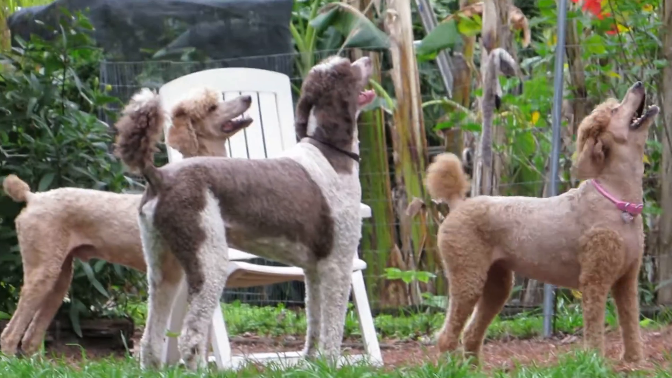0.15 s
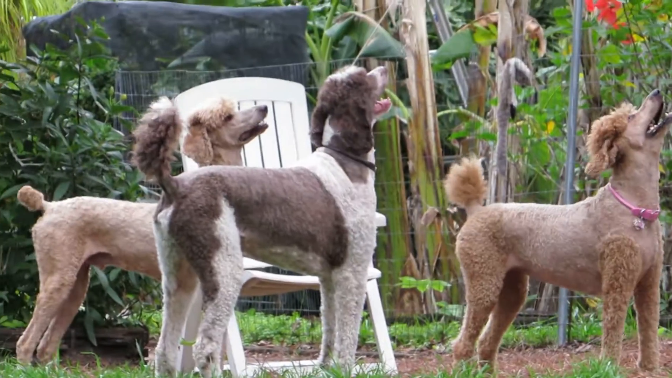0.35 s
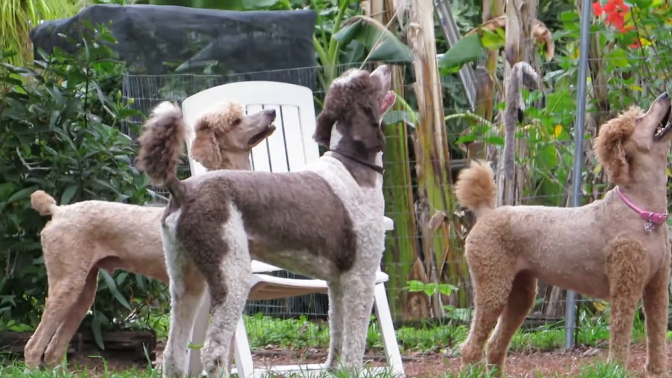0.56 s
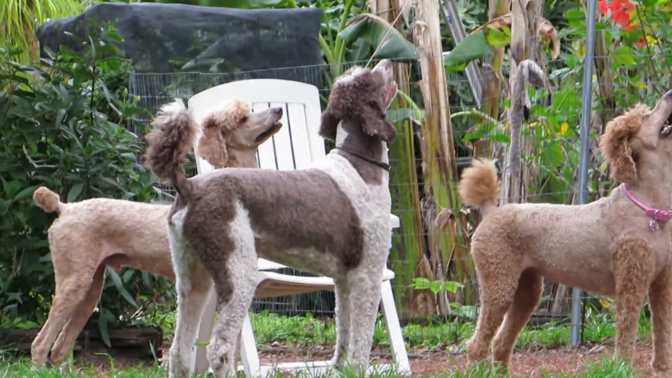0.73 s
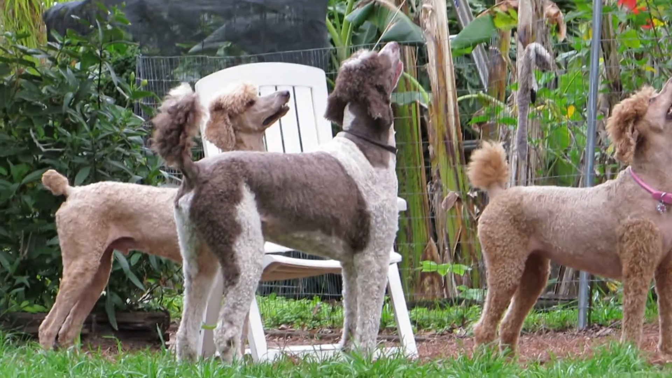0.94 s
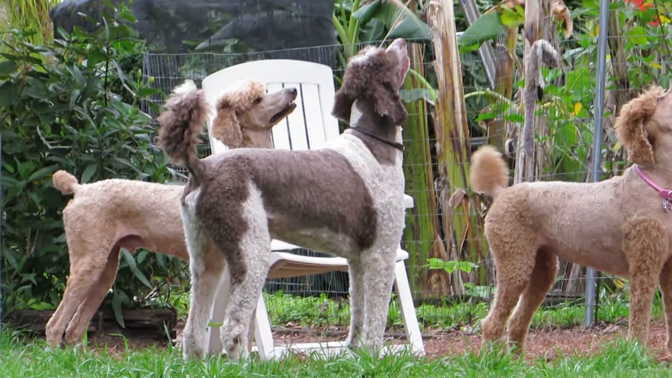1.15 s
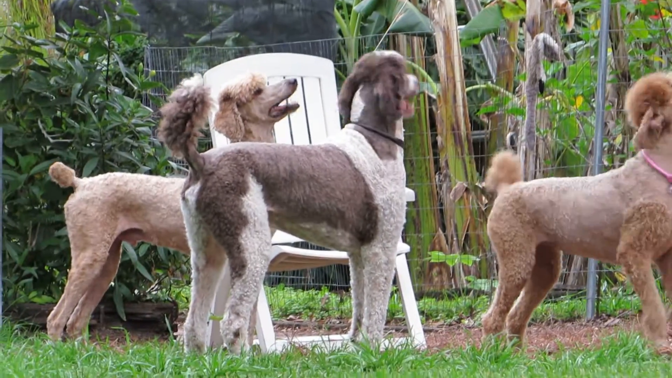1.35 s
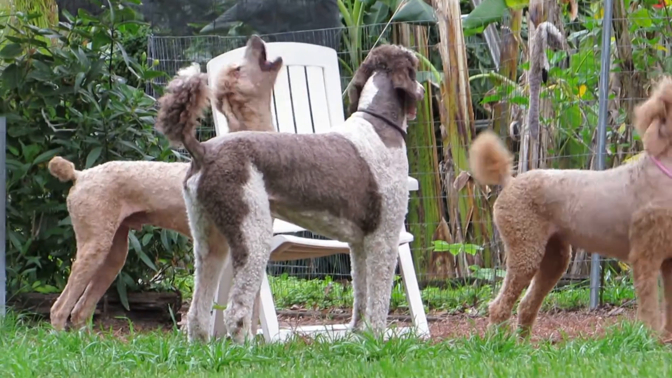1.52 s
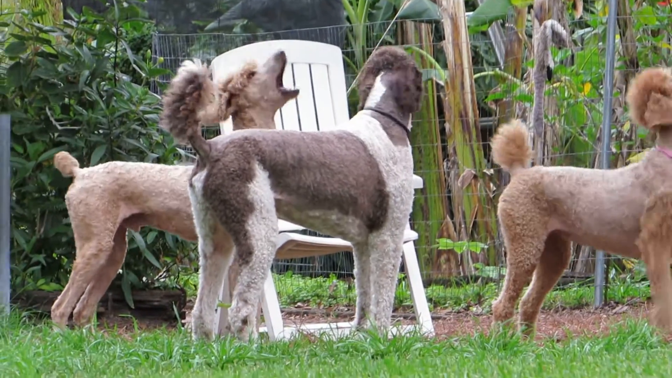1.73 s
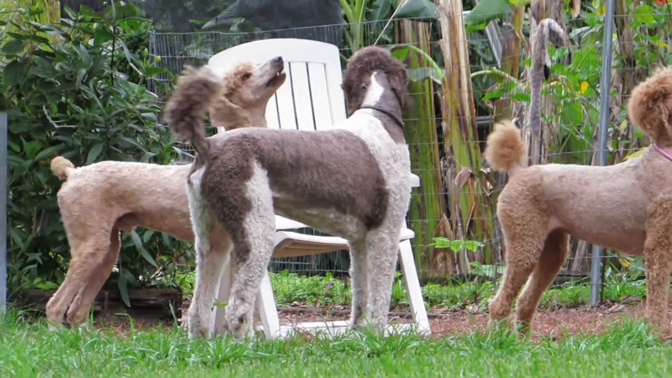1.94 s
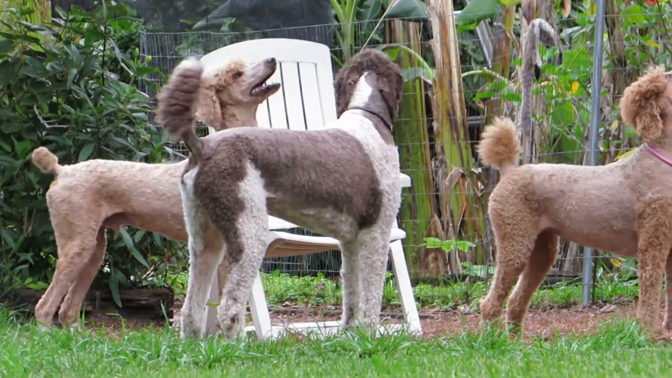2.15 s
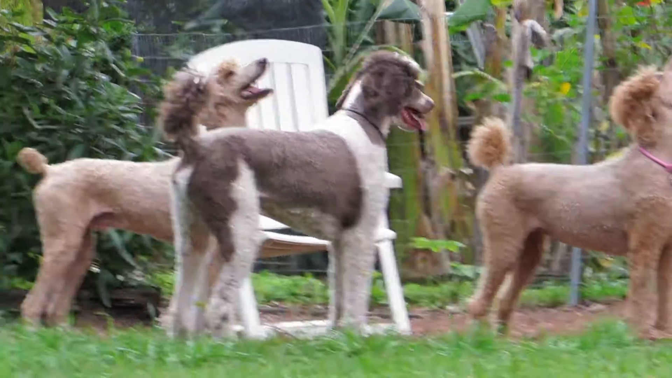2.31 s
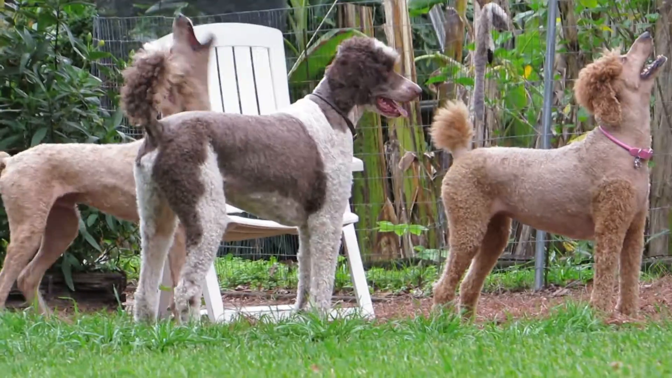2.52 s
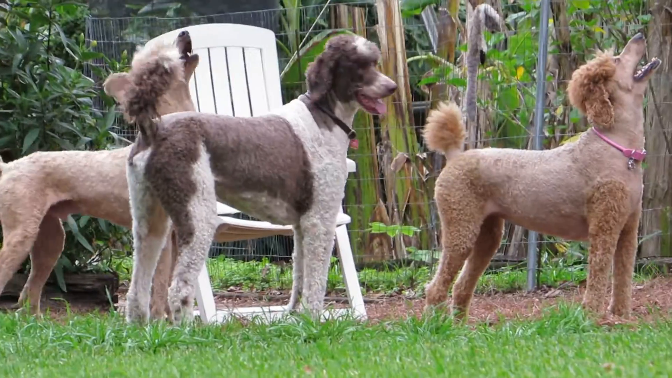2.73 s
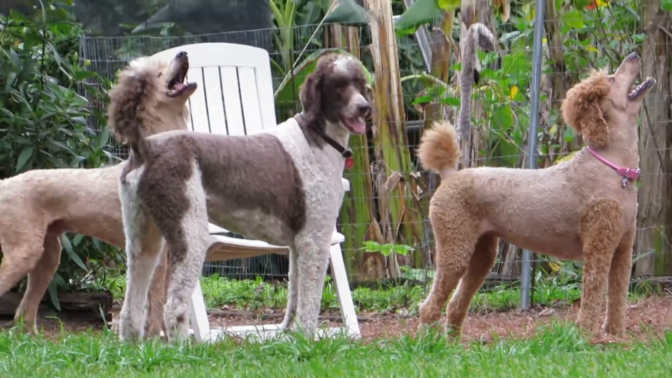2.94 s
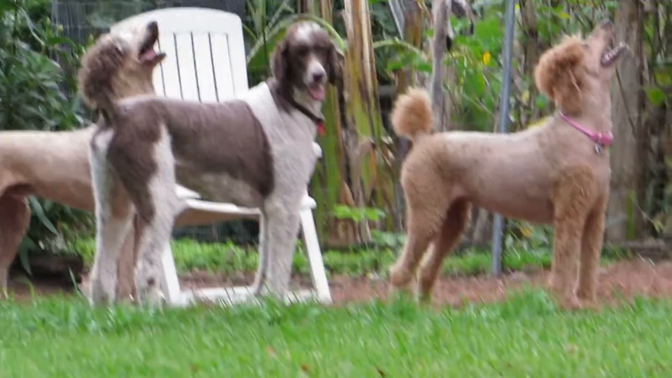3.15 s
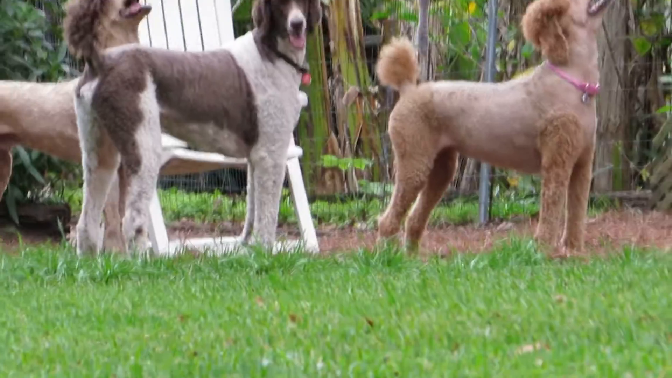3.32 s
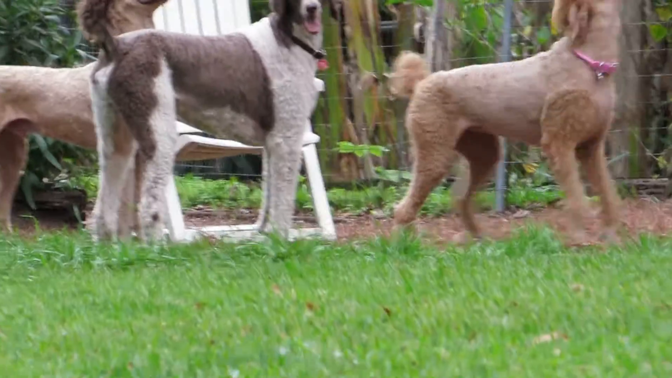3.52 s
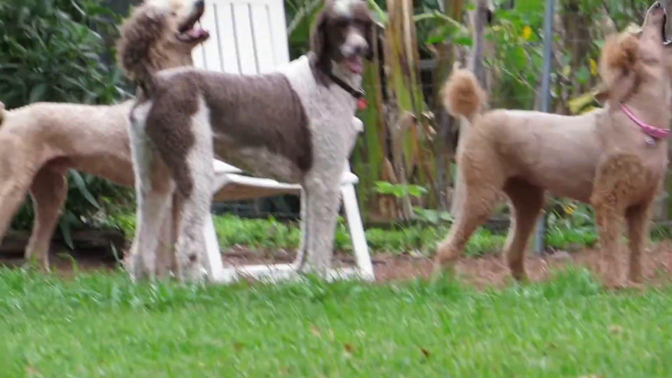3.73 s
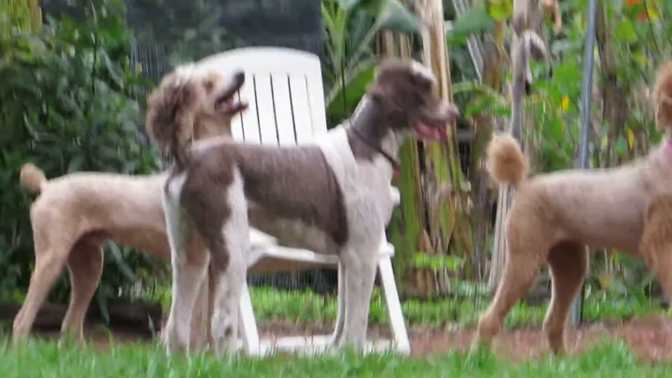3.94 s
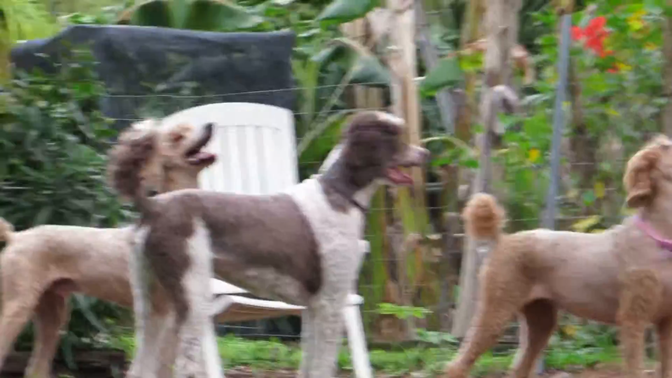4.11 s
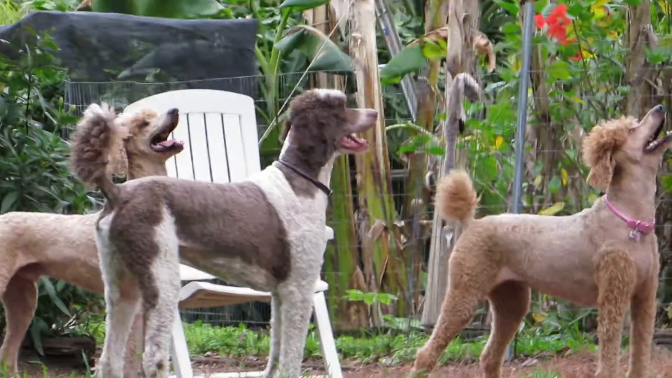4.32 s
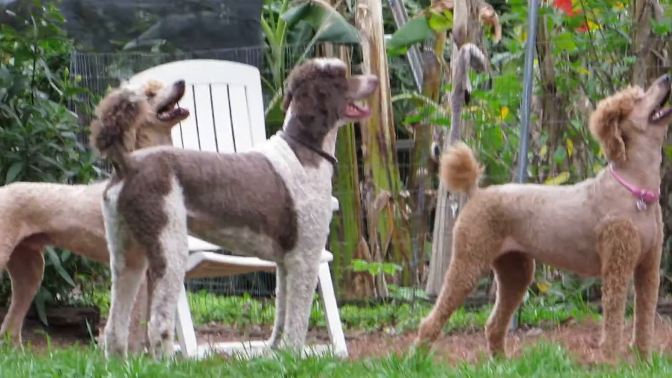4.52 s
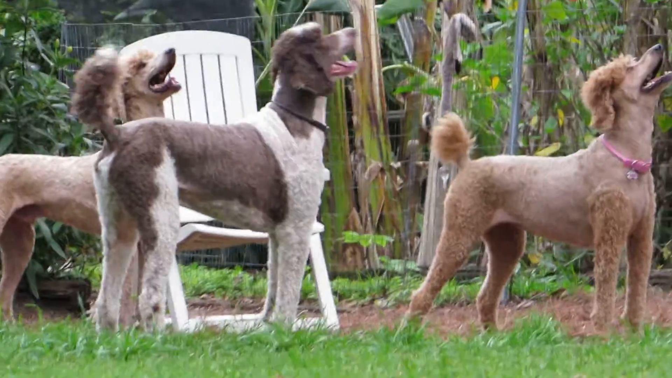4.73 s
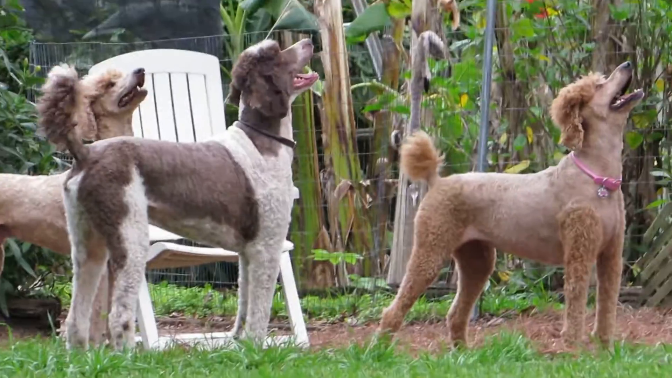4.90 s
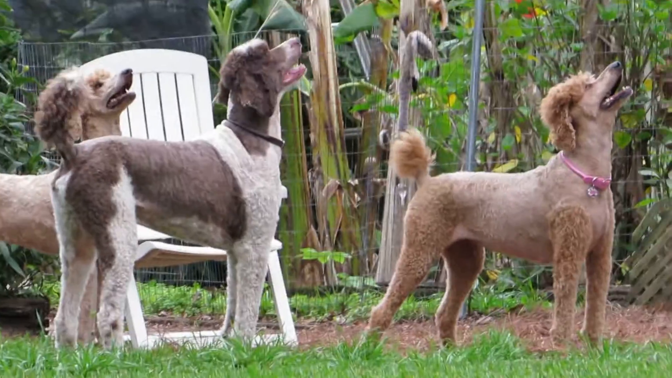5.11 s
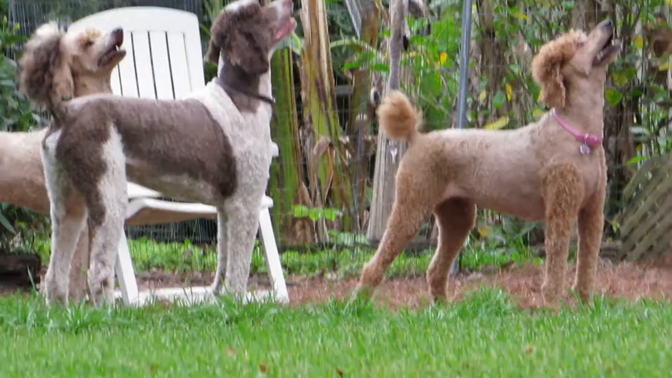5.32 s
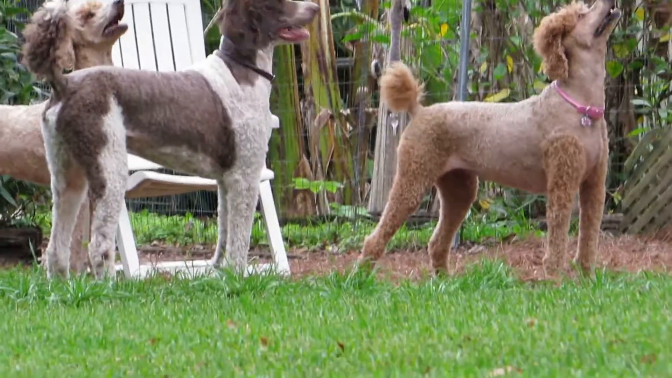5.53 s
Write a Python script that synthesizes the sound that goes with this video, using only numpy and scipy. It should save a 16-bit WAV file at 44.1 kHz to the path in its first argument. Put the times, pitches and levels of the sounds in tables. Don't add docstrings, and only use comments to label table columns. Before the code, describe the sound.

Loud, abrupt barks and a rising high yelp ring off garden surroundings, with faint whines, a wavering hum and leaf hiss behind.

```python
import sys
import numpy as np
from scipy import signal
from scipy.fft import rfft, irfft
from scipy.io import wavfile
from scipy.ndimage import uniform_filter1d

SR = 44100
rng = np.random.default_rng(int(sys.argv[2]) if len(sys.argv) > 2 else 0)


def wav_record(signal):
    frames = np.transpose(np.atleast_2d(signal))
    bounded = np.clip(frames, -1, 1)
    quanta = np.round(bounded * 32767).astype(np.int16)
    wavfile.write(sys.argv[1], SR, quanta)


def makeup_ratio(level_db):
    decades = np.asarray(level_db, float) / 20
    return 10 ** decades


N = 245195

# start_s, hold_s, level_db, note_hz
DEEP_BARKS = [
    (-.06, 0.0597, -29.5, 518.7),
    (1.288, 0.0403, -13, 511),
    (3.84, 0.0376, -12.5, 506.1),
]
# start_s, high_s, low_s, level_db, top_hz
SHARP_BARKS = [
    (2.552, 0.02484, 0.02957, -10.5, 684.3),
    (3.514, 0.00729, 0.0318, -10.5, 725.3),
]
# start_s, glide_s, level_db, from_hz, to_hz
CHOKED_BARKS = [
    (1.526, 0.0302, -18, 649, 658.5),
]
# start_s, glide_s, level_db, from_hz, to_hz
YELPS = [
    (1.54, 0.03615, -10.5, 1012, 1195),
    (1.562, 0.0432, -11, 1178, 1418),
    (1.819, 0.0168, -18.5, 1214, 1241),
    (1.842, .035, -13, 1273, 1434),
    (2.109, 0.051, -39, 1141, 1071),
    (2.15, 0.046, -39.5, 1068, 937.7),
    (4.692, 0.0358, -21.5, 1357, 1374),
    (4.75, 0.0453, -25, 1338, 1304),
]
# start_s, glide_s, level_db, from_hz, to_hz
WHINES = [(2.625, 0.0185, -31, 2927, 2762), (3.745, 0.0511, -35, 2826, 2795),
          (4.338, 0.1022, -39.5, 2773, 3450), (4.415, 0.04, -44.5, 3400, 3740),
          (4.452, 0.041, -37, 3720, 3251), (4.49, 0.0371, -40.5, 3300, 2812),
          (4.612, 0.0375, -43.5, 2620, 2756), (4.785, 0.0186, -38.5, 3028, 3296),
          (4.799, 0.021, -42, 3124, 3886), (4.806, 0.033, -47, 3200, 2710), (5.11, 0.0242, -49, 2360, 2477),
          (5.28, 0.044, -56, 2390, 2360), (5.39, 0.079, -53.5, 2550, 2335)]
# start_s, glide_s, level_db, from_hz, to_hz
PINCHED_WHINES = [(1.77, 0.035, -46, 2150, 2210), (1.84, 0.035, -51, 1900, 2240),
                  (1.891, .04, -43.5, 2150, 2210), (1.97, 0.1, -58, 2185, 2206),
                  (2.1, 0.066, -53.5, 2230, 2250), (4.525, .07, -53.5, 2648, 2549),
                  (4.59, 0.0557, -56, 2552, 2715), (4.69, 0.092, -51.5, 2742, 2700),
                  (4.81, 0.067, -52, 2730, 2485), (4.879, 0.063, -57, 2517, 2441),
                  (4.645, .06, -46.5, 3400, 3560), (4.711, .08, -49.5, 3480, 3380)]

# freq_hz, gain_db
DEEP_THROAT = [(350, -6.5), (500, -19), (720, -9.5), (1000, -2.5), (1280, -10.5), (1580, -6.5),
               (1780, -6.5), (2000, -9), (2400, -16), (3000, -26), (4000, -44), (5100, -29.5), (8500, -43),
               (14500, -52)]
SHARP_THROAT = [(350, -53), (520, -14), (660, -4.5), (830, -6), (1060, 5.5), (1400, -0.5), (1700, -2.5),
                (2050, -4.5), (2500, -17.5), (3600, -37), (4900, -28.5), (8200, -48.5), (10000, -44),
                (14500, -50)]
YELP_THROAT = [(800, 2.5), (1400, 5), (2300, -1), (2800, -28.5), (3400, -30.5), (4000, -32.5), (4900, -28),
               (7000, -36.5), (14000, -53)]
NOSE = [(2000, 8), (3500, 8), (5500, -9.5), (7000, 4.5), (10000, -75), (14000, -39.5)]
PINCHED_NOSE = [(2200, -3), (3500, -30), (4400, -4.5), (5200, 0), (7000, -1.5), (10000, -15),
                (14000, -13.5)]
DEEP_ROUGH = (.8, 1.0, .5, .3, .42, .45)
SHARP_ROUGH = (.07, .5, .85, .6, .4)

# freq_hz, density_db_per_hz
TRAFFIC_SPECTRUM = [(20, -4.5), (45, -18.5), (80, -8), (144, -11.5), (172, -16.5), (300, -18.5),
                    (477, -22.5), (804, -17), (1950, -29.5), (2440, -40), (4500, -61), (5850, -92)]
HISS_SPECTRUM = [(1760, -25), (3000, 8.5), (3650, -6.5), (4230, -7), (5000, -6.5), (7470, -11.5),
                 (8100, -13), (9700, -15), (10400, -13), (11200, -20), (13000, -17), (15100, -25)]
# freq_hz, likeness_0_1
LIKENESS = [(25, .1), (45, .2), (70, .6), (250, .15), (450, .2), (1600, .6), (4900, .12), (14000, .1)]
# time_s, level_db
STIR = [(0, 2.5), (1.3, 1.58), (1.45, 7), (1.7, 2.5), (1.92, 7), (2.2, 6), (2.3, 4.4), (2.8, -2), (3.3, 3),
        (3.5, 2.5), (3.62, 6.5), (4.2, 7), (4.3, 0.5), (4.47, 3.5), (4.75, 9.5), (5.0, 3.6), (5.45, 1.83),
        (5.56, 6)]
# top_s, length_s, order_2_db, order_4_db
SWELLS = [(0, 0.204, -32.5, -42), (0.161, 0.254, -41.5, -52.5), (0.495, 0.416, -34, -44.5),
          (0.665, 0.157, -55.5, -40.5), (0.756, 0.167, -34.5, -51), (1.025, 0.508, -33, -40.5),
          (1.296, 0.39, -40, -42), (1.485, 0.362, -34.5, -37.5), (1.695, 0.292, -53.5, -42.5),
          (1.863, 0.122, -38.5, -47), (2.0, 0.23, -37, -38), (2.272, 0.558, -36.5, -37.5),
          (2.519, 0.247, -44.5, -37), (2.833, 0.473, -42, -65), (3.218, 0.643, -41.5, -45),
          (3.491, 0.242, -34.5, -45), (3.722, 0.494, -36, -44), (3.925, 0.25, -38, -47.5),
          (4.065, 0.232, -45.5, -38.5), (4.213, 0.117, -50, -56.5), (4.422, 0.415, -42, -65.5),
          (4.612, 0.367, -34.5, -50.5), (4.9, 0.574, -37, -41), (5.154, 0.317, -42.5, -41),
          (5.387, 0.747, -35.5, -49), (5.56, 0.25, -38, -38)]
# start_s, length_s,
# from_hz, to_hz, level_db
BIRDS = [(0.151, 0.0584, 3697, 3463, -56), (0.276, 0.072, 3810, 3550, -61.5),
         (0.556, 0.144, 3270, 3640, -64.5), (0.942, 0.1, 3063, 3394, -62), (1.146, 0.066, 3350, 3196, -69),
         (2.055, 0.034, 3850, 3740, -49.5), (2.117, 0.0574, 3356, 3280, -55.5),
         (2.157, 0.0309, 3570, 2717, -47), (2.4, 0.0352, 3674, 3410, -58), (2.45, 0.078, 5826, 5663, -59),
         (2.871, 0.0358, 3373, 3238, -58), (2.979, 0.009, 2715, 2730, -51.5),
         (3.224, 0.0273, 2810, 2602, -46.5), (3.26, 0.0503, 3550, 3390, -57),
         (3.235, 0.077, 5360, 5450, -63), (4.163, 0.0582, 3400, 3760, -57), (4.474, 0.052, 3570, 2647, -56),
         (4.639, 0.045, 13550, 14160, -55), (4.79, 0.0498, 3300, 2730, -62.5),
         (1.904, 0.051, 2670, 3280, -50), (1.93, 0.061, 3100, 2390, -54.5)]
# start_s, length_s, level_db
THUDS = [
    (1.317, 0.154, -40.5),
    (1.963, 0.1005, -37.5),
    (3.876, 0.16, -44),
    (4.844, 0.252, -49.5),
]
# start_s, peak_db
TWIGS = [
    (2.497, -42.5),
    (3.854, -30.5),
    (3.869, -36.5),
    (4.212, -40.5),
    (4.255, -44.5),
]
# freq_hz, t60_s
GARDEN_T60 = [(400, 0.71), (1000, 0.352), (2000, 0.487), (4000, 0.395), (10000, 0.605)]
# freq_hz, width_hz
NOTCHES = [(3950, 382), (7950, 150)]

DEEP_ATTACK_S, DEEP_SETTLE_S, DEEP_RELEASE_S = 0.02013, 0.02263, 0.069
DEEP_FLAT, DEEP_FADE_DB = 0.075, 15.5
SHARP_RISE_S, SHARP_BREAK_S, SHARP_DROP_S = 0.03, 0.009737, 0.01572
SHARP_CUT_S, SHARP_RELEASE_S = 0.01665, 0.049
SHARP_START, SHARP_LOW_HZ = 0.71, 549.2
SHARP_CUT_DB, SHARP_FADE_DB = 17, 28.5
# attack_s, release_s, droop_db, sag_0_1, roughness_0_1
CHOKED_SHAPE = (0.008, 0.031, 2.7, 0.16, 0.386)
YELP_SHAPE = (0.0149, 0.0564, 0.5, 0.029, 0.0404)
WHINE_SHAPE = (0.0131, 0.0084, 2.55, 0.026, 0.062)
PINCHED_SHAPE = (0.026, 0.04, 3.07, 0.023, 0.13)
ONSET_DB, FADE_DB, WEAK_ROUGH = 19.5, 24.5, 0.0795
BURST_DB = 7.5
BREAK_UP_HZ = 12500
MOTOR_HZ, THIRD_ORDER_DB, LULL_DB = 34.84, -50, -56
TRAFFIC_DB, HISS_DB, TRAFFIC_FOLLOWS = -51, -66.5, 0.642
INSECT_HZ, INSECT_WIDTH_HZ, INSECT_DB = 10220, 570, -70
THUD_LOW_HZ, THUD_HIGH_HZ = 110, 322.5
TWIG_T60_S, TWIG_LOW_HZ = 0.0094, 900
TAIL_DB, TAIL_SIDE_DB = -2, -8.5
FAR_TAIL_DB, FAR_T60_S = -14, 1.677
GAIN_KNEE_DB, GAIN_SLOPE, GAIN_RELEASE_DB_PER_S, GAIN_ATTACK_S = -21, 0.3, 28, 0.057


def rms_one(x):
    return x / np.sqrt(np.mean(np.abs(x) ** 2) + 1e-20)


def at_hz(points, hz):
    table_hz, values = np.array(points).T
    return np.interp(np.log(hz), np.log(table_hz), values)


def wander(hz, size):
    r = np.exp(-2 * np.pi * hz / SR)
    run_in = int(SR / hz)
    noise = rng.standard_normal(size + run_in)
    return rms_one(signal.lfilter([1], [1, -2 * r, r * r], noise)[run_in:])


def bandpass(low_hz, high_hz, order=2):
    return signal.butter(order, [low_hz, high_hz], "band", fs=SR, output="sos")


def bands(count):
    edges_hz = np.geomspace(20, 16000, count + 1)
    for low_hz, high_hz in zip(edges_hz, edges_hz[1:]):
        yield np.sqrt(low_hz * high_hz), bandpass(low_hz, high_hz)


def left_right(left_db, right_db):
    return makeup_ratio(np.array([[left_db], [right_db]]))


def wash(spectrum, low_hz, high_hz, patchy_db):
    out = 0
    white = rng.standard_normal((2, 2, N))
    for k, (hz, sos) in enumerate(bands(count=24)):
        mid, side = signal.sosfilt(sos, white[k % 2])
        alike = np.clip(at_hz(LIKENESS, hz), 0, 1)
        gain = makeup_ratio(at_hz(spectrum, hz) + patchy_db * wander(8.93, N))
        out = out + gain * (np.sqrt(1 + alike) * mid + np.sqrt(1 - alike) * side * [[1], [-1]])
    reference = signal.sosfilt(bandpass(low_hz, high_hz, order=4), out.mean(axis=0))
    return out / np.std(reference)


def traffic(stir_db):
    gain = makeup_ratio(TRAFFIC_DB + TRAFFIC_FOLLOWS * stir_db)
    return gain * wash(TRAFFIC_SPECTRUM, 148.1, 477, patchy_db=1.5) * left_right(1.6, -1.7)


def leaf_hiss(stir_db):
    return makeup_ratio(HISS_DB + stir_db) * wash(HISS_SPECTRUM, 7643, 18300, patchy_db=2.5)


def swells():
    t = np.arange(N) / SR
    total = makeup_ratio(LULL_DB)
    for top_s, length_s, second_db, fourth_db in SWELLS:
        hump = np.cos(np.pi * np.clip((t - top_s) / length_s, -0.5, 0.5)) ** 2
        total = total + hump * left_right(second_db, fourth_db)
    return 20 * np.log10(total)


def motor(second_db, fourth_db):
    turn = 2 * np.pi * np.cumsum(MOTOR_HZ * (1 + 0.01355 * wander(4.23, N))) / SR
    second = makeup_ratio(second_db) * np.sin(2 * turn)
    third = makeup_ratio(THIRD_ORDER_DB + 4.0 * wander(5, N)) * np.sin(3 * turn + 1.7 * wander(4.1, N))
    fourth = makeup_ratio(fourth_db - 0.85) * np.sin(4 * turn + 0.48 * wander(7.0, N))
    return np.sqrt(2) * (second + third + fourth) * left_right(1.5, -1.6)


def insects():
    sos = bandpass(INSECT_HZ - INSECT_WIDTH_HZ / 2, INSECT_HZ + INSECT_WIDTH_HZ / 2)
    chirr = signal.sosfilt(sos, rng.standard_normal((2, N)))
    return makeup_ratio(INSECT_DB + 2.45 * wander(6, N)) * rms_one(chirr)


def deep_bark(start_s, hold_s, level_db, note_hz):
    steps_s = [0, DEEP_ATTACK_S, DEEP_SETTLE_S, DEEP_SETTLE_S, hold_s, DEEP_RELEASE_S]
    times_s = start_s + np.cumsum(steps_s)
    pitch_hz = note_hz * (1 - DEEP_FLAT * np.array([1, 1, 1, 0, 0, 1]))
    loss_db = np.array([21, 9.0, 0, 0.6, 6.5, DEEP_FADE_DB])
    return np.transpose([times_s, pitch_hz, level_db - loss_db, DEEP_ROUGH])


def birds():
    out = np.zeros(N)
    for start_s, length_s, from_hz, to_hz, level_db in BIRDS:
        size = round(length_s * SR)
        start = round(start_s * SR)
        pitch_hz = np.linspace(from_hz, to_hz, size) + 35 * wander(99.7, size)
        whistle = np.sin(2 * np.pi * np.cumsum(pitch_hz) / SR)
        out[start:start + size] += makeup_ratio(level_db + 7.5) * np.hanning(size) * whistle
    return out


def thuds():
    lumps = np.zeros(N)
    for start_s, length_s, level_db in THUDS:
        start, size = round(start_s * SR), round(length_s * SR)
        lumps[start:start + size] += makeup_ratio(level_db) * np.hanning(size)
    low = signal.sosfilt(bandpass(THUD_LOW_HZ, THUD_HIGH_HZ), rng.standard_normal(N))
    return lumps * rms_one(low) * left_right(1.6, -1.6)


def glide(start_s, length_s, level_db, from_hz, to_hz, shape):
    attack_s, release_s, droop_db, sag, rough = shape
    t = np.arange(0, length_s + release_s, 0.002)
    along = np.clip(t / length_s, 0, 1)
    dying = np.clip((t - length_s) / release_s, 0, 1)
    weak = np.maximum(1 - t / min(attack_s, length_s / 2), 0)
    eased_hz = from_hz + (to_hz - from_hz) * np.sin(np.pi / 2 * along) ** 2
    pitch_hz = eased_hz * (1 - sag * dying)
    levels_db = level_db - ONSET_DB * weak - droop_db * along - FADE_DB * dying
    return np.transpose([start_s + t, pitch_hz, levels_db, rough + WEAK_ROUGH * (weak + dying)])


def twigs():
    t = np.arange(N) / SR
    cracks = np.zeros(N)
    for start_s, peak_db in TWIGS:
        cracks += (t >= start_s) * makeup_ratio(peak_db - 9 - 60 * np.abs(t - start_s) / TWIG_T60_S)
    sos = signal.butter(2, TWIG_LOW_HZ, "high", fs=SR, output="sos")
    return cracks * signal.sosfilt(sos, rng.standard_normal(N))


def sharp_bark(start_s, high_s, low_s, level_db, top_hz):
    rise, broken, drop, chest, end = SHARP_ROUGH
    steps_s = [0, SHARP_RISE_S / 2, SHARP_RISE_S / 2, SHARP_BREAK_S, high_s,
               SHARP_DROP_S, low_s, SHARP_CUT_S, SHARP_RELEASE_S]
    times_s = start_s + np.cumsum(steps_s)
    high_hz = top_hz * np.array([SHARP_START, 0.88, 1, 0.96, 0.95])
    chest_hz = SHARP_LOW_HZ * np.array([0.96, 1, 0.98, 0.96])
    pitch_hz = np.concatenate([high_hz, chest_hz])
    loss_db = np.array([32, 11, 0, 2.5, 2.5, 2.6, 2.4, SHARP_CUT_DB, SHARP_FADE_DB])
    rough = [rise, rise, rise, broken, broken, drop, chest, drop, end]
    return np.transpose([times_s, pitch_hz, level_db - loss_db, rough])


def call(rows, throat, jitter, closing_db):
    times_s, *columns = np.transpose(rows)
    start = max(round(times_s[0] * SR), 0)
    t = np.arange(start, round(times_s[-1] * SR)) / SR
    size = len(t)
    pitch_hz, level_db, rough = [np.interp(t, times_s, column) for column in columns]
    rough = np.clip(rough, 0, 1)
    shaky_hz = pitch_hz * (1 + jitter * rough * wander(140.2, size))
    phase = 2 * np.pi * np.cumsum(shaky_hz) / SR
    bursts = makeup_ratio(BURST_DB * rough * np.tanh(wander(157.2, size)))
    tilt_db = closing_db * np.linspace(0, 1, size)
    smear_hz = 0.7 * pitch_hz.mean()
    source = np.zeros(size)
    for k in range(1, int(14500 / pitch_hz.max()) + 1):
        smear = (wander(smear_hz, size) + 1j * wander(smear_hz, size)) / np.sqrt(2)
        high_blur = (k > 2) * (k * pitch_hz / BREAK_UP_HZ) ** 2
        blur = np.clip(rough * (1 + k * pitch_hz / 5000) + high_blur, 0, 1)
        fading = makeup_ratio(0.273 * k ** 0.86 * wander(11.9, size))
        envelope = fading * np.sqrt(1 - blur ** 2) + blur * smear * bursts
        partial = envelope * np.exp(1j * (k * phase + 2 * np.pi * rng.random()))
        source += makeup_ratio(-tilt_db * np.log2(k * pitch_hz / 1000)) * partial.imag
    hz = np.fft.rfftfreq(size, 1 / SR) + 1
    spectrum = rfft(source * np.hanning(size) ** 0.162)
    sound = irfft(spectrum * makeup_ratio(at_hz(throat, hz)), size)
    running_rms = np.sqrt(uniform_filter1d(sound ** 2, size=1500) + 1e-12)
    out = np.zeros(N)
    out[start:start + size] = sound / running_rms * makeup_ratio(level_db)
    return out


def dogs():
    deep = [deep_bark(*row) for row in DEEP_BARKS]
    sharp = [sharp_bark(*row) for row in SHARP_BARKS]
    sharp += [glide(*row, CHOKED_SHAPE) for row in CHOKED_BARKS]
    yelps = [glide(*row, YELP_SHAPE) for row in YELPS]
    whines = [glide(*row, WHINE_SHAPE) for row in WHINES]
    pinched = [glide(*row, PINCHED_SHAPE) for row in PINCHED_WHINES]
    # calls, throat, jitter, closing_db, pan_db
    voices = [(deep, DEEP_THROAT, 0.08, 8.0, 0.6),
              (sharp, SHARP_THROAT, 0.12, 3.0, 0.8),
              (yelps, YELP_THROAT, 0.04, 1.5, 0.4),
              (whines, NOSE, 0.04, 0.3, 0.7),
              (pinched, PINCHED_NOSE, 0.04, 1.5, 0.7)]
    out = np.zeros((2, N))
    for calls, throat, jitter, closing_db, pan_db in voices:
        voice = sum(call(rows, throat, jitter, closing_db) for rows in calls)
        out += voice * left_right(pan_db / 2, -pan_db / 2)
    return signal.sosfilt(signal.cheby2(10, 60, 360, "high", fs=SR, output="sos"), out)


def garden(x):
    t = np.arange(SR) / SR
    white = rng.standard_normal((2, 2, SR))
    tail = 0
    for k, (hz, sos) in enumerate(bands(count=18)):
        near = makeup_ratio(-60 * t / at_hz(GARDEN_T60, hz))
        far = makeup_ratio(FAR_TAIL_DB - 60 * t / FAR_T60_S - 29.2 * abs(np.log2(hz / 1300)))
        tail = tail + signal.sosfilt(sos, white[k % 2]) * (near + far)
    mid, side = tail * (1 - np.exp(-t / 0.0009))
    scale = makeup_ratio(TAIL_DB) / np.sqrt(np.sum(mid ** 2))
    ears = scale * (mid + makeup_ratio(TAIL_SIDE_DB) * side * np.array([[1], [-1]]))
    return signal.fftconvolve(x.mean(axis=0, keepdims=True), ears, axes=1)[:, :N]


def gain_control(x):
    power = uniform_filter1d(np.mean(x ** 2, axis=0), size=441)
    level_db = 10 * np.log10(power + 1e-12)
    ramp_db = GAIN_RELEASE_DB_PER_S * np.arange(N) / SR
    held_db = np.maximum.accumulate(level_db + ramp_db) - ramp_db
    r = np.exp(-1 / (GAIN_ATTACK_S * SR))
    wanted_cut_db = GAIN_SLOPE * np.maximum(held_db - GAIN_KNEE_DB, 0)
    cut_db = signal.lfilter([1 - r], [1, -r], wanted_cut_db)
    return x * makeup_ratio(-cut_db)


def scene():
    stir_db = np.interp(np.arange(N) / SR, *np.transpose(STIR))
    voices = dogs() + birds()
    background = motor(*swells()) + traffic(stir_db) + leaf_hiss(stir_db) + insects()
    return voices + garden(voices) + background + thuds() + twigs()


def low_pass(x):
    return signal.sosfilt(signal.butter(12, 15240, fs=SR, output="sos"), x)


def record(dry):
    mix = 1.5 * np.tanh(gain_control(dry) / 1.5)
    for hz, width_hz in NOTCHES:
        mix = signal.lfilter(*signal.iirnotch(hz, hz / width_hz, fs=SR), mix)
    mix = signal.sosfilt(signal.butter(8, 14400, fs=SR, output="sos"), mix)
    return low_pass(mix)


dry = scene()
out = record(dry)
wav_record(out)
```